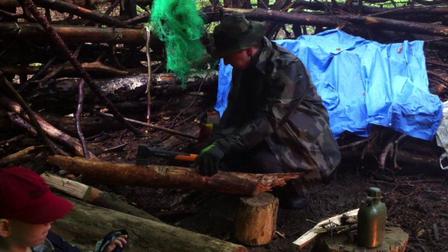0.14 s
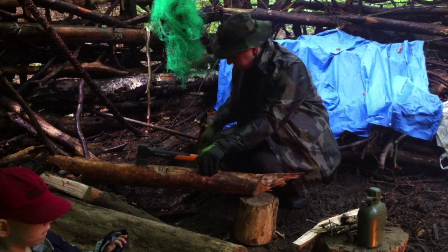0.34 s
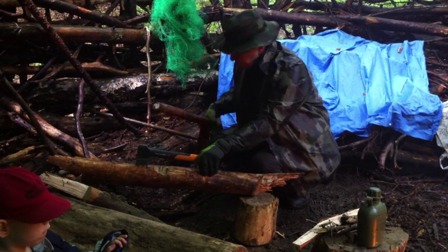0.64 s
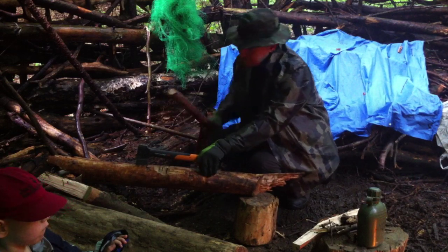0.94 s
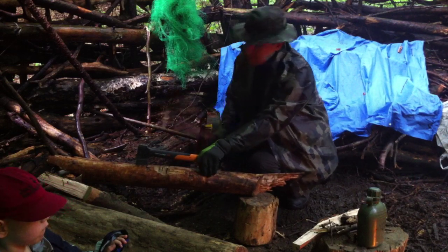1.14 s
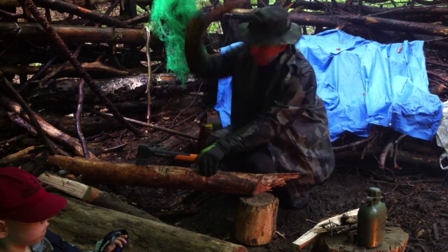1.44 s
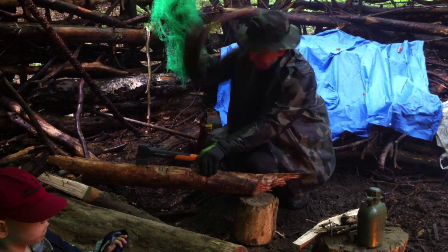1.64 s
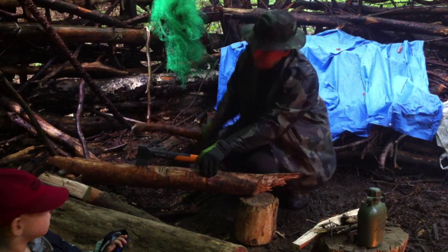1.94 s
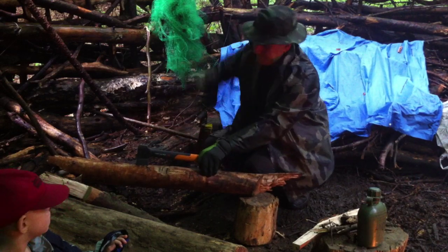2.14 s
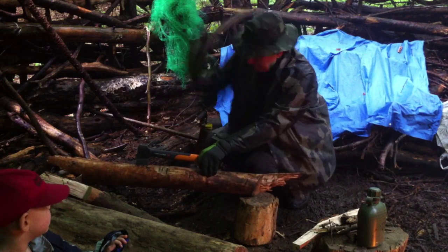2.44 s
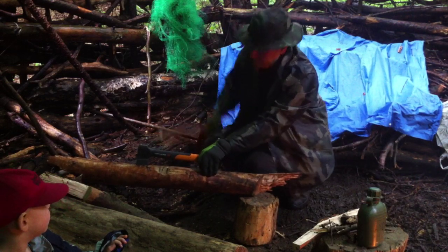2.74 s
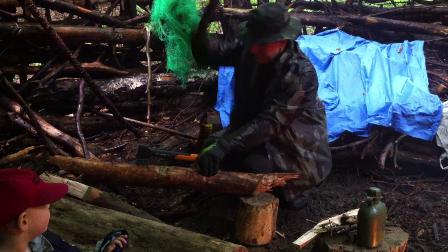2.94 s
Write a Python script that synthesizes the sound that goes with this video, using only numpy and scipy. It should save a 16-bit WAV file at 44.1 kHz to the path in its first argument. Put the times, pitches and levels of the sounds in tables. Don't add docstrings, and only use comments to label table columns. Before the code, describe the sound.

Wooden baton knocks a hatchet into a dry log twice, loud, beside a popping, crackling camp fire

```python
import sys
import numpy as np
from scipy import signal
from scipy.fft import rfft, irfft, next_fast_len
from scipy.io import wavfile
from scipy.ndimage import map_coordinates

SR = 44100
rng = np.random.default_rng(int(sys.argv[2]) if len(sys.argv) > 2 else 0)


def ratio_of_db(decibels):
    return 10 ** (np.asarray(decibels, float) / 20)


def to_wav(s):
    ch = np.atleast_2d(s).T
    pcm = np.round(np.clip(ch, -1, 1) * 32767)
    wavfile.write(sys.argv[1], SR, pcm.astype(np.int16))


N = 136710

# pitch_hz, level_db
HISS_SPECTRUM = [(210, -37), (350, -9.5), (496, -11), (600, -12.5), (798, -5.5), (1030, -10.5), (2540, -14),
                 (5100, -14), (15500, -24)]
FLUTTER_SPECTRUM = [(15, -61), (25, -31), (27, -51), (59, -22.5), (139, -1.5), (284, -7), (436, -15),
                    (500, -12), (650, -16), (1100, -120)]
STEAM_SPECTRUM = [(2000, -10.5), (6000, -2.5), (11000, -5.5), (15500, -8)]
RUMBLE_SPECTRUM = [(25, -5.5), (50, -1), (90, 0.5)]
# centre_s, length_s, level_db
STEAM_BURSTS = [
    (0.223, 0.049, -48.5),
    (0.306, 0.03, -45.5),
    (0.6, 0.082, -48),
    (1.1, .05, -47),
    (1.278, .08, -50.5),
    (1.612, 0.12, -50.5),
]
# start_s, peak_db, pitch_hz, scatter_db, echo_delay_s
POPS = [
    (.15713, -15, 1100, -14, .0088),
    (.5347, -21, 2300, -18, .006),
    (1.34233, -1, 1200, -25, .0074),
    (1.69825, -15, 1900, -19, .0066),
    (1.93932, -8, 1100, -21, .0085),
    (1.9647, -6, 1150, -22, .0069),
    (2.10336, -8, 2800, -16, .0042),
    (2.2922, -30, 4800, -8, .0035),
    (2.51336, -5, 2300, -19, .0062),
]
# start_s, peak_db, pitch_hz, direction (push 1, pull
SNAPS = [(.15762, -14, 1500, -1), (.15786, -12, 5500, 1), (.1581, -20, 4500, 1), (.1735, -24, 1000, 1),
         (.1815, -26, 800, -1), (.15855, -17, 750, 1), (.1664, -21, 900, 1), (.34735, -27, 900, -1),
         (.53574, -18, 3500, 1), (.5361, -26, 900, -1), (.57283, -23, 4500, 1), (.5729, -27, 3500, -1),
         (.6739, -24, 1100, -1), (.7856, -28, 5000, 1), (.7861, -29, 800, -1), (.7868, -26, 600, 1),
         (1.34263, -3, 1600, -1), (1.3432, -13, 500, 1), (1.3497, -12, 1000, -1), (1.6221, -26, 700, 1),
         (1.62385, -21, 650, -1), (1.69857, -16, 2300, -1), (1.7044, -17, 1100, -1), (1.7049, -19, 1100, 1),
         (1.7286, -28, 1500, -1), (1.9395, -12, 6000, -1), (1.9396, -16, 500, -1), (1.94025, -11, 1800, 1),
         (1.9485, -18, 500, 1), (1.9649, -12, 1300, -1), (1.972, -19, 350, 1), (2.031, -29, 6000, 1),
         (1.9659, -15, 600, 1), (1.9668, -17, 500, -1), (2.10445, -14, 3500, 1), (2.1061, -14, 1500, -1),
         (2.109, -11, 2000, -1), (2.1111, -14, 1200, 1), (2.2921, -19, 5000, -1), (2.29436, -17, 5000, -1),
         (2.468, -31, 7000, 1), (2.585, -31, 9000, 1), (2.5144, -13, 800, 1), (2.5148, -16, 900, -1),
         (2.5195, -15, 900, -1), (2.73805, -10, 4500, -1), (2.7403, -11, 5000, -1)]
# pitch_hz, level_db
SCATTER_SPECTRUM = [(250, 12.5), (800, 5), (2000, -14.5), (5000, -7), (15000, -22.5)]
# start_s, length_s, from_hz, to_hz, level_db
BIRD_NOTES = [
    (.2, 0.36, 5930, 5770, -57),
    (.6, .3, 5650, 5600, -55),
    (.85, .3, 5620, 5700, -61),
    (1.15, 0.175, 4480, 4540, -53),
    (1.434, 0.333, 5270, 5230, -56.5),
]
# start_s, peak_db, pitch_hz, edge_db, t60_s
TICKS = [(0.348, -40, 790, -28.5, 0.046), (.426, -34, 1830, -30.5, 0.074), (0.448, -32.5, 860, -17, 0.029),
         (0.574, -33, 1870, -20, 0.043), (0.6731, -28.5, 1450, -27.5, 0.033),
         (0.753, -33, 1800, -11, 0.0084), (0.7853, -34.5, 600, -13.5, 0.15),
         (0.81, -32.5, 1630, -16, 0.054), (0.9012, -29, 2100, -12.5, 0.017), (1.062, -34, 2350, -11, 0.033),
         (1.2032, -30.5, 2300, -19, 0.11), (1.6212, -29, 677, -22, 0.11), (1.7298, -30, 1130, -16, 0.033),
         (1.819, -30, 1220, -22, 0.026), (2.738, -27, 3000, 3, 0.0444), (2.846, -26.5, 2740, -15.5, 0.1)]
# start_s, peak_db, pitch_hz
PUFFS = [
    (1.0434, -23.5, 171),
    (1.06, -29.5, 171),
]
# start_s, length_s, from_hz, to_hz, level_db
GUSTS = [
    (1.41, 0.04, 127, 108, -38),
    (1.56, 0.065, 99, 190, -32.5),
    (2.02, 0.086, 98, 169, -34),
    (2.89, 0.062, 225, 232, -44),
    (2.97, .05, 155.4, 119.3, -37),
    (3.01, 0.059, 96.4, 150, -35),
    (3.045, 0.043, 196, 230, -38),
]
# start_s, strength_db, steel_ring_db, brightness_db_per_octave, spray_db
BLOWS = [
    (1.8535, 4.5, -36.5, -1.5, -35),
    (2.6659, 9, -29.5, 0, -30.5),
]
# pitch_hz, first_blow_db, second_blow_db, t60_s
WOOD_MODES = [(464, -23, -21, 0.11), (686, -7, -7.5, 0.091), (818.2, -4.5, -4, 0.034),
              (1032.4, -11.5, -19.5, .12), (1222, -6.5, -9, .045), (1414.6, -12.5, 1, 0.031),
              (1590, -9.5, -8.5, .05), (1805, -1, -2, 0.031), (1944, -10.5, -10.5, 0.049),
              (2192, -20, -16.5, 0.041), (603, -10, -14.5, 0.04), (2503, -19, -20.5, 0.14),
              (2660, -27, -21.5, 0.081), (721, -11.5, -18, 0.058)]
# pitch_hz, level_db, t60_s
STEEL_MODES = [(970, -3.5, 0.85), (1400, 0.5, .5), (1490, -2.5, 0.92), (1880, -2, 0.54), (2460, -4, 0.69),
               (2546, -3.5, 0.97), (2050, -11, .6), (2720, -11.5, .4), (3350, -13, .2), (5830, -16.5, .1)]
# pitch_hz, level_db
CRACK_SPECTRUM = [(300, -13.5), (700, 15.5), (2000, 6.5), (4000, -6.5), (9000, -10.5), (15000, -17)]
SPRAY_SPECTRUM = [(1500, 3.5), (4000, -0.5), (9000, -7), (15000, -14.5)]
THUD_SPECTRUM = [(90, -8.5), (200, 1.5), (380, -1.5)]
# pitch_hz, t60_s
TREES_DECAY = [(200, 1), (1000, 1), (3000, 0.88), (8000, 0.38), (15000, .12)]
# time_s, gain_db
GAIN = [(0, -0.5), (1.868, -0.5), (1.872, -3.5), (1.901, 0.5), (2.111, -4.5), (2.65, -3), (2.6822, -4.5),
        (2.6827, -6.5), (2.7, -5.5), (2.93, -6), (3.1, -6.5)]
# start_s, end_s, lost_above_hz
DROPOUTS = [
    (1.325, 1.3385, 1600),
    (1.8355, 1.8495, 300),
    (1.874, 1.879, 10500),
    (1.928, 1.937, 9500),
    (1.957, 1.962, 11000),
    (2.0905, 2.099, 2800),
    (2.277, 2.288, 6500),
    (2.503, 2.51, 8000),
    (2.6475, 2.662, 20),
    (2.834, 2.843, 10000),
]

HISS_DB, FLUTTER_DB, RUMBLE_DB = -48.5, -49.5, -67
SLOW_SWING_DB = 1.5
SIZZLE_DB, SIZZLE_PER_S, SPIT_TOP_DB = -60, 630, 12
POP_DAMPING, POP_STOP, POP_LOW_HZ, POP_TOP_HZ = 0.17, 1.3, 190, 11000
SNAP_TOP, SNAP_DAMPING = 3, 0.45
SPIKE_DB, SPIKE_S = 1, 0.00004
ECHO_DB, ECHO_HZ = -15, 2500
SCATTER_PITCH, SCATTER_WIDE_DB, SCATTER_GRAIN_DB, SCATTER_T60_S = 0.6, 1, 2, 0.13
LEAD_DB, LEAD_S = -32, 0.0034
BIRD_BLUR_HZ = 90
CLICK_DB, TICK_SPIKE_DB, TICK_WIDTH = 1, -4, 0.8
PUFF_T60_S, PUFF_RISE_S = 0.031, 0.0015
BLOW_HOLD_S, BLOW_RISE_S = 0.006, 0.0016
CONTACT_DB, CONTACT_T60_S = -13.5, 0.037
CRACK_DB, CRACK_T60_S, CRACK_GRAIN_DB = -3.5, 0.089, 3
THUD_DB, THUD_T60_S, SPRAY_T60_S = -25.5, 0.15, 0.38
WOOD_PHASE, STEEL_PHASE = 0.6, 0.8
UNSTEADY, RATTLE_PER_S = 0.3, 140
TREES_DB, TREES_DELAY_S = -29.5, 0.013
WOOD_FAR = 0.2
LOW_CUT_HZ, TOP_HZ = 30, 15700
CLIP_TOP, CLIP_HARD = 1.03, 6


def unit(x):
    return x / np.sqrt(np.mean(x ** 2) + 1e-20)


def along(points, hz):
    f, v = np.transpose(points)
    return np.interp(np.log(hz + 1), np.log(f + 1), v)


def wobble(rate, size=N):
    knots = rng.standard_normal(int(size * rate / SR) + 4)
    return map_coordinates(knots, [np.arange(size) * rate / SR])


def filtered(x, response):
    m = next_fast_len(len(x) + 8192)
    return irfft(rfft(x, m) * response(np.fft.rfftfreq(m, 1 / SR)), m)[:len(x)]


def noise(spectrum, size=N):
    closed = [(spectrum[0][0] / 2, -60)] + list(spectrum) + [(SR / 2, -60)]
    return unit(filtered(rng.standard_normal(size), lambda hz: ratio_of_db(along(closed, hz))))


def add(out, s, x):
    part = out[round(s * SR):][:len(x)]
    part += x[:len(part)]


def band(hz, width):
    return lambda f: 1j * f * width / (hz * hz - f * f + 1j * f * width)


def glide(hz):
    return np.sin(2 * np.pi * np.cumsum(hz) / SR)


def fire():
    t = np.arange(N) / SR
    hiss = ratio_of_db(HISS_DB + 0.22 * wobble(2.7) + 0.6 * wobble(44)) * noise(HISS_SPECTRUM)
    swing_db = SLOW_SWING_DB * wobble(3.1) + 0.61 * wobble(23)
    flutter = ratio_of_db(FLUTTER_DB) * unit(ratio_of_db(swing_db) * noise(FLUTTER_SPECTRUM))
    spit_db = np.minimum(5 * rng.exponential(size=N), SPIT_TOP_DB)
    spits = (rng.random(N) < SIZZLE_PER_S / SR) * ratio_of_db(spit_db) * rng.choice([-1, 1], N)
    sizzle = ratio_of_db(SIZZLE_DB) * unit(filtered(spits, band(3500, 4000)))
    swell = sum(ratio_of_db(db) * np.exp(-(2 * (t - s) / length) ** 2) for s, length, db in STEAM_BURSTS)
    steam = swell * noise(STEAM_SPECTRUM)
    rumble = ratio_of_db(RUMBLE_DB + 3 * wobble(4.7)) * noise(RUMBLE_SPECTRUM)
    return hiss + rumble + flutter + sizzle + steam


def burst(hz, top_hz, damping=POP_DAMPING):
    t = np.arange(SR // 5) / SR
    turn = 2 * np.pi * hz * t
    swing = np.cos(turn) * np.exp(-damping * turn ** POP_STOP)
    spike = ratio_of_db(SPIKE_DB) * np.exp(-t / SPIKE_S)
    return filtered(swing + spike, lambda f: (1j * f / (POP_LOW_HZ + 1j * f) / (1 + 1j * f / top_hz)) ** 2)


def pops():
    out, t = np.zeros(N), np.arange(SR // 5) / SR
    for s, db, hz, scatter_db, echo_s in POPS:
        pop = burst(hz, POP_TOP_HZ)
        echo = filtered(pop, lambda f: -ratio_of_db(ECHO_DB) / (1 + 1j * f / ECHO_HZ) ** 2)
        near = unit(filtered(rng.standard_normal(len(t)), band(SCATTER_PITCH * hz, hz)))
        wide = filtered(noise(SCATTER_SPECTRUM, size=len(t)), lambda f: f * f / (f * f + (hz / 4) ** 2))
        grain = ratio_of_db(SCATTER_GRAIN_DB * wobble(350, size=len(t)))
        scatter = (near + ratio_of_db(SCATTER_WIDE_DB) * wide) * grain
        add(out, s, ratio_of_db(db) * (pop + scatter * ratio_of_db(scatter_db - 60 * t / SCATTER_T60_S)))
        add(out, s + echo_s, ratio_of_db(db) * echo)
        add(out, s - LEAD_S, ratio_of_db(db + LEAD_DB) * scatter[-round(LEAD_S * SR):])
    for s, db, hz, way in SNAPS:
        snap = burst(hz, SNAP_TOP * hz, SNAP_DAMPING)
        add(out, s, way * ratio_of_db(db) * snap / snap.max())
    return out


def bird():
    out = np.zeros(N)
    for s, length, hz0, hz1, db in BIRD_NOTES:
        n = round(length * SR)
        hz = np.linspace(hz0, hz1, n) + BIRD_BLUR_HZ * wobble(299, size=n)
        level = ratio_of_db(db + 4 * wobble(42, size=n)) * np.hanning(n) ** 0.5
        add(out, s, level * glide(hz))
    return out


def ticks():
    out, t = np.zeros(N), np.arange(SR // 10) / SR
    for s, db, hz, edge_db, t60 in TICKS:
        rattle = unit(filtered(rng.standard_normal(len(t)), band(hz, TICK_WIDTH * hz)))
        rattle = rattle * ratio_of_db(-6.5 - 60 * t / t60)
        edge = ratio_of_db(edge_db - 60 * t / (0.38 * t60)) * rng.standard_normal(len(t))
        click = ratio_of_db(CLICK_DB) * np.sin(2 * np.pi * hz * t) * np.exp(-1.5 * hz * t)
        spike = ratio_of_db(TICK_SPIKE_DB + edge_db / 2) * np.exp(-t / SPIKE_S)
        add(out, s, ratio_of_db(db) * (click + spike + rattle + edge))
    return out


def puffs():
    out, t = np.zeros(N), np.arange(SR // 8) / SR
    for s, db, hz in PUFFS:
        envelope = ratio_of_db(db + 14.5 - 60 * t / PUFF_T60_S) * (1 - np.exp(-t / PUFF_RISE_S))
        add(out, s, envelope * np.sin(2 * np.pi * hz * t))
    for s, length, hz0, hz1, db in GUSTS:
        n = round(length * SR)
        add(out, s, ratio_of_db(db) * np.hanning(n) * glide(np.linspace(hz0, hz1, n)))
    return filtered(out, lambda f: (1j * f / (70 + 1j * f)) ** 2)


def ring(modes, t, phase, hold_s=0, tilt_db=0):
    out = np.zeros(len(t))
    for hz, db, t60 in modes:
        decay = ratio_of_db(db + tilt_db * np.log2(hz / 1000) - 60 * np.maximum(t - hold_s, 0) / t60)
        waver = 1 + UNSTEADY * wobble(55, size=len(t))
        rattle = phase * wobble(RATTLE_PER_S, size=len(t))
        out += decay * waver * np.sin(2 * np.pi * hz * t + rattle)
    return out


def baton():
    out, log, t = np.zeros(N), np.zeros(N), np.arange(SR // 2) / SR
    rise = 1 - np.exp(-t / BLOW_RISE_S)
    for k, (s, db, steel_db, tilt_db, spray_db) in enumerate(BLOWS):
        crack_db = CRACK_DB - 60 * t / CRACK_T60_S + CRACK_GRAIN_DB * wobble(270, size=len(t))
        crack = ratio_of_db(crack_db) * noise(CRACK_SPECTRUM, size=len(t))
        bark_db = spray_db - 60 * t / SPRAY_T60_S + 1.6 * wobble(220, size=len(t))
        spray = ratio_of_db(bark_db) * noise(SPRAY_SPECTRUM, size=len(t))
        modes = [(hz, dbs[k], t60) for hz, *dbs, t60 in WOOD_MODES]
        wood = ring(modes, t, WOOD_PHASE, BLOW_HOLD_S, tilt_db)
        steel = ratio_of_db(steel_db - db) * ring(STEEL_MODES, t, STEEL_PHASE)
        thud = ratio_of_db(THUD_DB - 60 * t / THUD_T60_S) * noise(THUD_SPECTRUM, size=len(t))
        contact = ratio_of_db(CONTACT_DB - 60 * t / CONTACT_T60_S) * noise(SPRAY_SPECTRUM, size=len(t))
        lead = noise(CRACK_SPECTRUM, size=len(t))[:round(LEAD_S * SR)]
        add(out, s, ratio_of_db(db) * contact)
        add(out, s, ratio_of_db(db) * (wood + steel + crack + spray + thud) * rise)
        add(log, s, ratio_of_db(db) * wood * rise)
        add(out, s - LEAD_S, ratio_of_db(db + LEAD_DB) * lead)
    return out, log


def trees(x):
    hz, t, z = signal.stft(rng.standard_normal(SR // 2), SR, nperseg=256)
    decay = ratio_of_db(-60 * t / along(TREES_DECAY, hz)[:, None])
    tail = signal.istft(z * decay, SR, nperseg=256)[1]
    delayed = np.pad(x, (round(TREES_DELAY_S * SR), 0))
    return signal.fftconvolve(delayed, tail / np.linalg.norm(tail))[:N]


def scene():
    knocks, wood = baton()
    crackle = pops() + ticks()
    far = knocks - (1 - WOOD_FAR) * wood + crackle
    early = np.arange(N) < 2.4 * SR
    echoes = trees(far * early) + trees(far * ~early)
    return (fire() + crackle + bird() + puffs() + knocks + ratio_of_db(TREES_DB) * echoes)[None]


def starved(x):
    t, out = np.arange(N) / SR, x.copy()
    for s0, s1, hz in DROPOUTS:
        gate = np.clip(np.minimum(t - s0, s1 - t) / 0.001 + 0.5, 0, 1)
        before = x * (t < s1 + 0.001)
        out -= gate * filtered(before, lambda f: 1 / (1 + (hz / (f + 1)) ** 10))
    return out


def top_cut(x):
    return signal.sosfilt(signal.butter(12, 15640, fs=SR, output="sos"), x)


def record(dry):
    s, db = np.transpose(GAIN)
    x = filtered(dry[0], lambda f: (1j * f / (LOW_CUT_HZ + 1j * f)) * (f < TOP_HZ))
    x = x * ratio_of_db(np.interp(np.arange(N) / SR, s, db))
    x = x / (1 + np.abs(x / CLIP_TOP) ** CLIP_HARD) ** (1 / CLIP_HARD)
    mix = starved(x)[None]
    return top_cut(mix)


dry = scene()
out = record(dry)
to_wav(out)
```